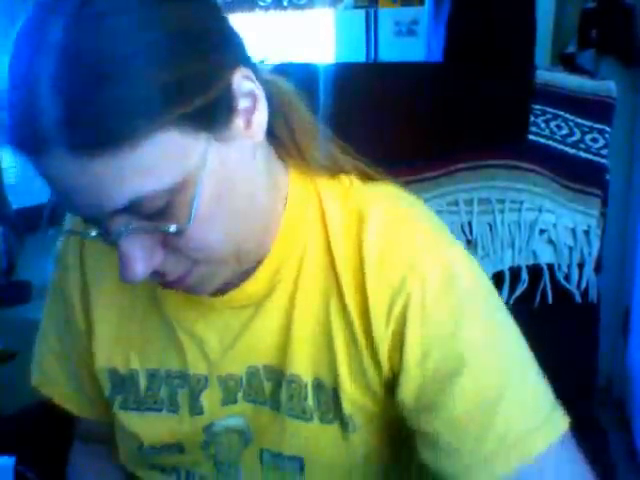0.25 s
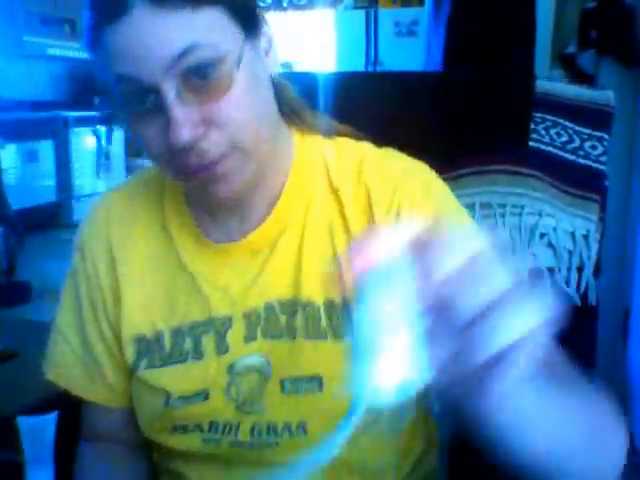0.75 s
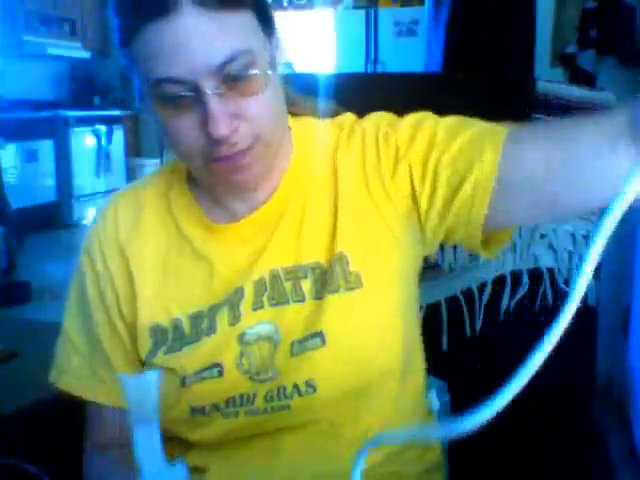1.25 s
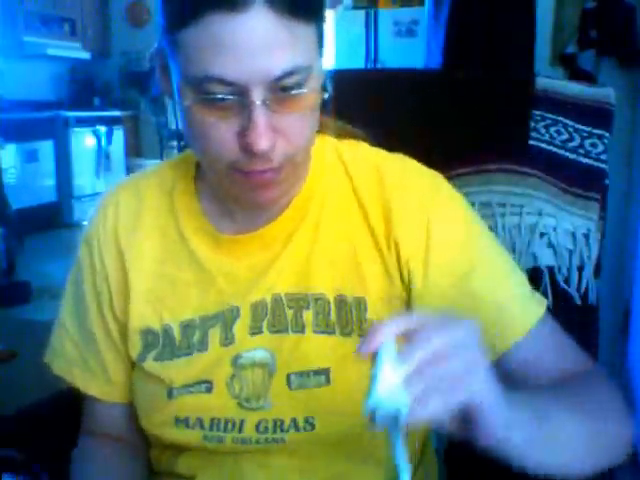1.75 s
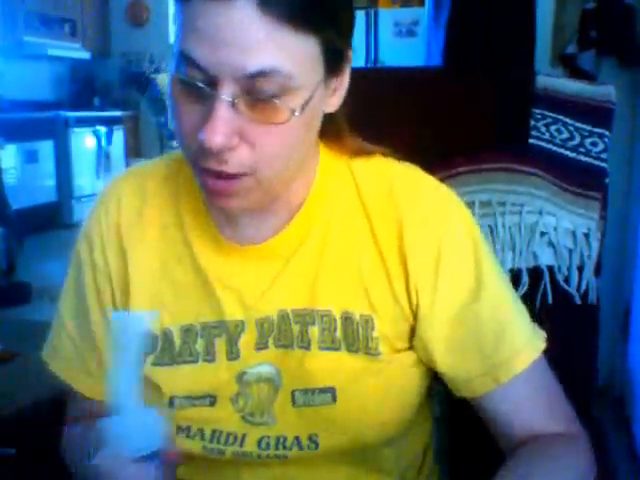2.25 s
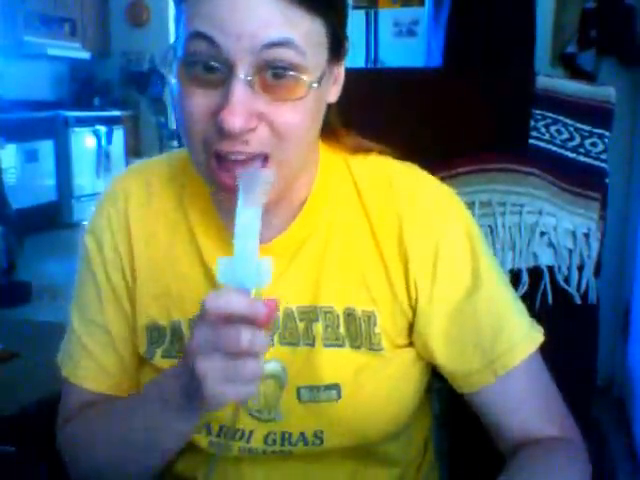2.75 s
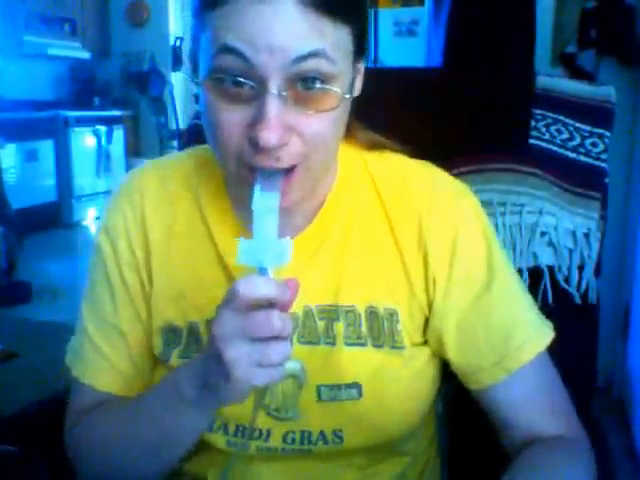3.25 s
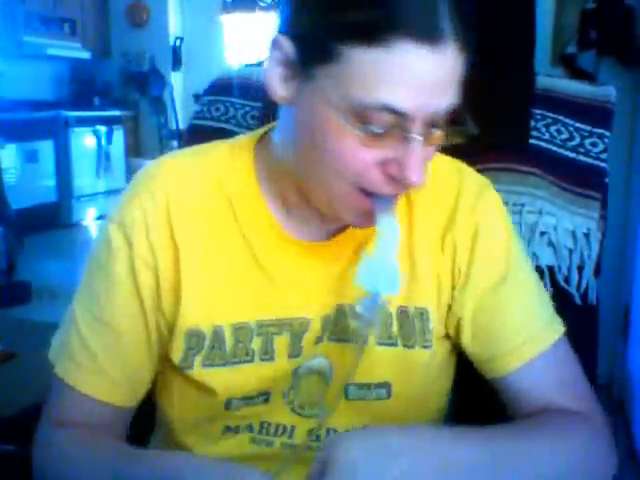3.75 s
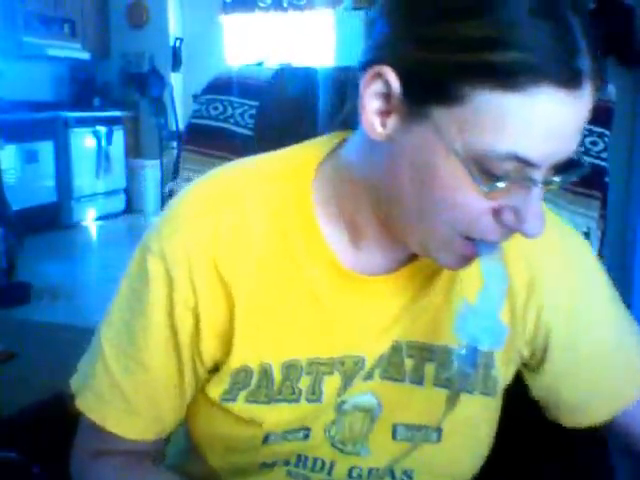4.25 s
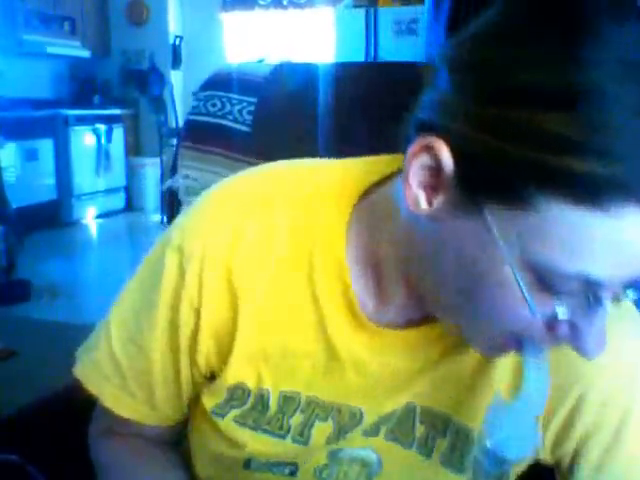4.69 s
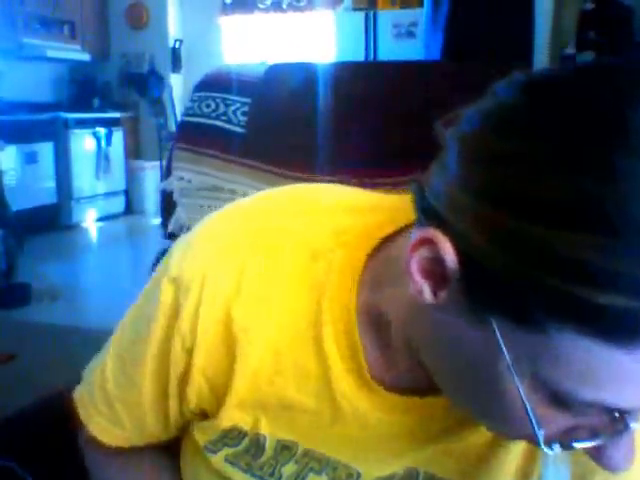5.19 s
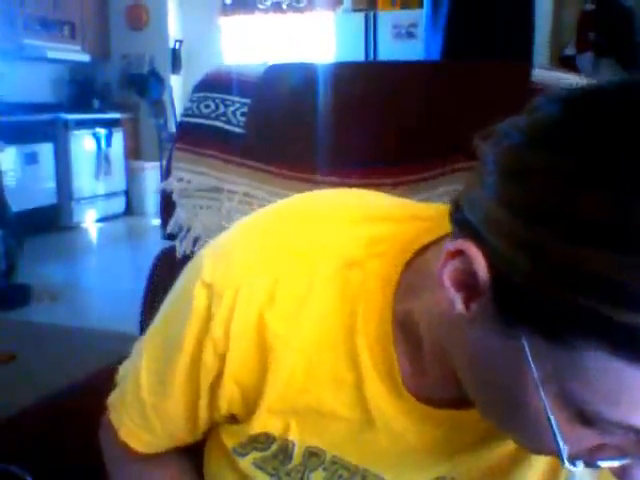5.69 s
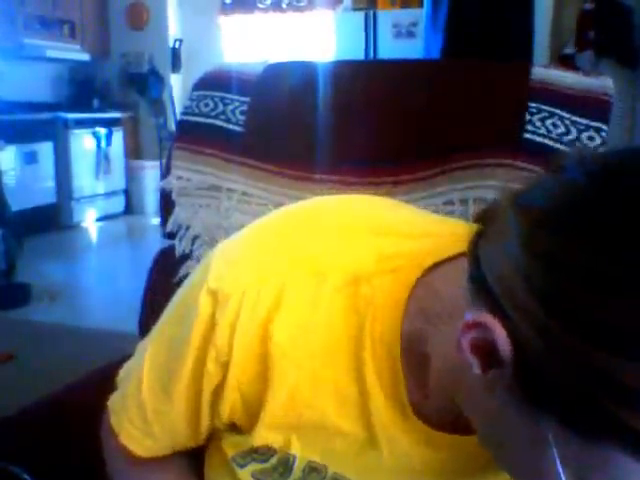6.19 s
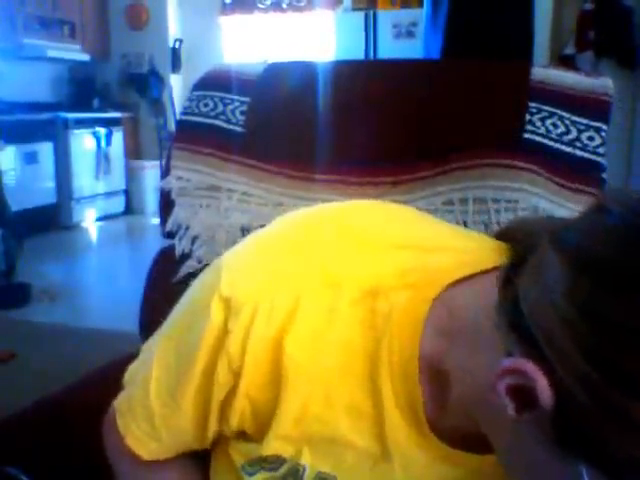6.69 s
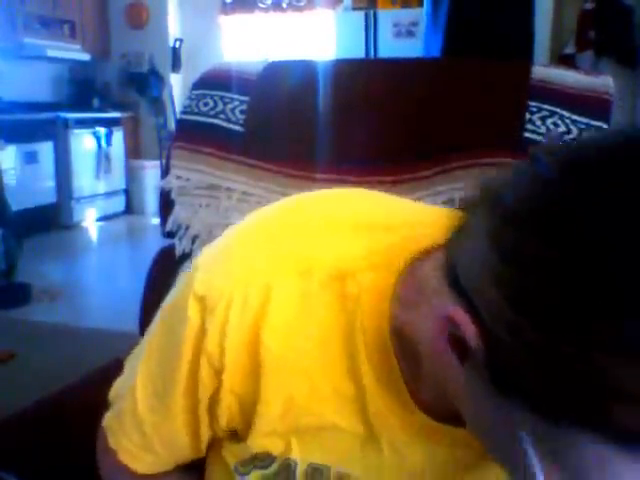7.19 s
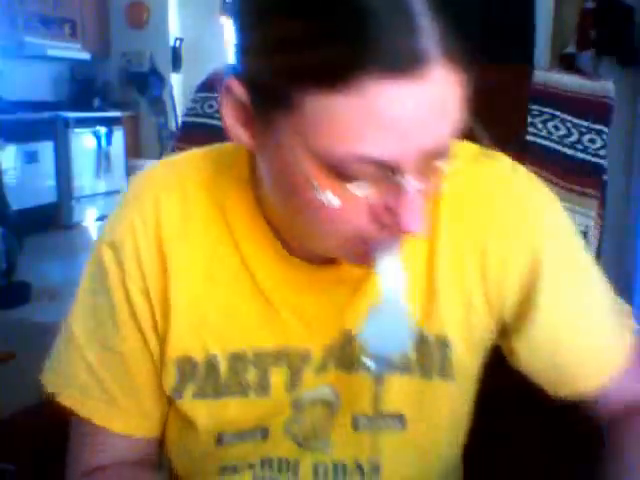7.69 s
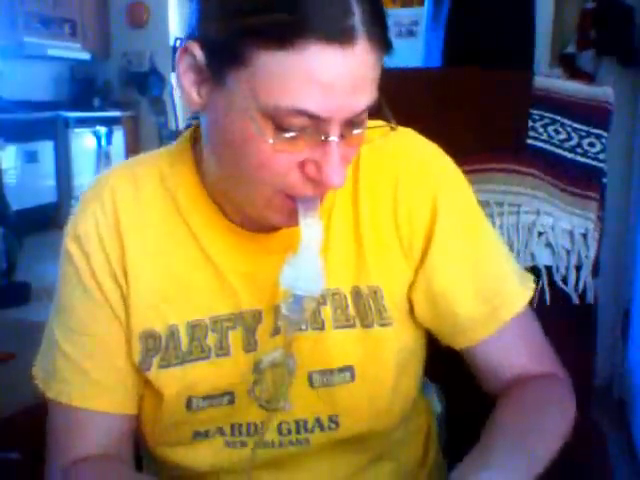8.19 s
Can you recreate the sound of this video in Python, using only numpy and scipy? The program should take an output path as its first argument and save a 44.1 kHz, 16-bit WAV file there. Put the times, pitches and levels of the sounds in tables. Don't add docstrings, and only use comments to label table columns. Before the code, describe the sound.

A steady low fan hum near 90 Hz with soft air noise fills a quiet room, picked up close by a band-limited laptop microphone. At once, 0-0.35 s, hard plastic parts clatter onto a desk, sharp and hollow with short crackling skids. From 0.63 to 1.2 s they are gathered and shaken, a brighter dense rattle that fades into small taps. Light ticks and a brief cable scuff come around 1.4-1.5 s and a tick at 1.8 s. Bright mouthpiece clicks follow at 3.0-3.25 and 3.65 s. Dull plug bumps and low desk thumps fall at 4.8-4.95, 5.3 and 6.0 s, with hardly audible ticks near 6.7 s. From 7.0 to 7.85 s a busier cluster of knocks, scuffs and thumps plays. A small snap at 8.08 s and faint metallic pin clinks until 8.2 s end it, leaving the hum.

```python
import sys
import numpy as np
from scipy import signal
from scipy.fft import rfft, irfft
from scipy.io import wavfile
from scipy.ndimage import uniform_filter1d, minimum_filter1d

SR = 44100
rng = np.random.default_rng(int(sys.argv[2]) if len(sys.argv) > 2 else 0)


def master_out(mix):
    frames = np.transpose(np.atleast_2d(mix))
    ceiling = np.clip(frames, -1, 1)
    pcm = np.round(ceiling * 32767).astype(np.int16)
    wavfile.write(sys.argv[1], SR, pcm)


def magnitude_from_level(level_db):
    exponent = np.asarray(level_db, float) / 20
    return 10 ** exponent


N = 372204

# pitch in Hz, level in dB rms.
FAN_LINES = [(209.9, -71.5), (253.0, -73), (409.1, -91.5), (527.6, -81), (554.5, -84.5), (683.7, -83),
             (899.0, -85), (1023, -81), (1066, -89), (1362, -85), (1405, -88.5), (1534, -88.5), (1701, -90),
             (2385, -99), (2514, -100), (2552, -103.5)]
# frequency in Hz, level in dB per Hz.
AIR_SPECTRUM = [(15, -67.5), (27, -75), (60, -69.5), (100, -70), (150, -78), (300, -81), (500, -84),
                (1000, -92.5), (2100, -99), (4000, -107), (6200, -112), (7400, -122), (9000, -126),
                (12000, -140)]
# start in seconds, strength in dB, softness in dB, # chatter time in
# seconds (the chatter dies by 60 dB in 2.2 times this), ring brought out in Hz.
DROP = [(0.001, -67, 31.5, 0.036, 899.2), (0.052, -58, 5.5, 0.04, 2203), (0.0635, -42.5, 12, 0.05, 902.7),
        (0.0715, -19, 2.5, 0.02, 2290), (0.0828, -30, 17.5, 0.015, 539.6),
        (0.1025, -29.5, 2.5, 0.015, 2317), (0.1255, -39, 4.5, 0.02, 920), (0.157, -53.5, 14, 0.02, 2301),
        (0.1732, -46.5, 3.5, 0.033, 1901), (0.198, -54, 11.5, 0.041, 3400),
        (0.2044, -41, 7.5, 0.023, 896.5), (0.2379, -56.5, 20.5, 0.03, 1600),
        (0.2587, -26.5, 1.5, 0.024, 6280), (0.264, -36.5, 12, 0.03, 2890), (0.2983, -40, 4.5, 0.015, 2260)]
# start in seconds, strength in dB, softness in dB, # chatter time
# in seconds (the chatter dies by 60 dB in 2.2 times this), ring brought out in Hz.
GATHER = [(0.631, -19.5, 3.5, 0.011, 4970), (0.6411, -25, 1.5, 0.017, 2890),
          (0.6505, -18, 2.5, 0.0079, 5680), (0.654, -29.5, 14.5, 0.018, 950), (0.6631, -35, 3, 0.015, 5900),
          (0.6824, -37, 1.5, 0.013, 5910), (0.712, -48, 3, 0.031, 5600), (0.73, -49, 1, 0.0305, 4600),
          (0.7386, -35, 6, 0.03, 4200), (0.7765, -33.5, 2, 0.026, 2720), (0.784, -32.5, 4, 0.033, 4140),
          (0.8006, -32, 2, 0.011, 2270), (0.836, -43, 8, 0.04, 2320), (0.8593, -55, 10.5, 0.02, 3000),
          (0.8809, -20, 2, 0.015, 5100), (0.891, -37, 5.5, 0.02, 900), (0.9028, -30, 5, 0.025, 3200),
          (0.9085, -15.5, 2, 0.016, 5900), (0.9189, -27, 5.5, 0.031, 900), (1.0036, -44, 5, 0.027, 3040),
          (1.017, -55, -1, 0.043, 5900), (1.042, -46.5, 0, 0.048, 4330), (1.0479, -31.5, 1.5, 0.02, 1810),
          (1.1165, -51, 11, 0.028, 1930), (1.1364, -51.5, 17.5, 0.013, 3010),
          (1.1828, -52.5, 18, 0.034, 2320)]
# start in seconds, level in dB, length in seconds.
SKIDS = [
    (.072, -33, 0.066),
    (.135, -45, .09),
    (.26, -42.5, 0.053),
    (.3, -47, 0.06),
    (.632, -31.5, 0.14),
    (.778, -39, 0.079),
    (.882, -30.5, .03),
    (.91, -34.5, 0.14),
    (1.0, -51.5, 0.054),
    (1.042, -40.5, 0.047),
]
# pitch in Hz, width in Hz, level in dB.
PART_MODES = [(500, 120, 12), (925, 25, 3), (1400, 47.4, -5), (1850, 20, -3), (2270, 70, -1), (2885, 38, 3),
              (3578, 260, -0.5), (4621, 140, -1), (5042, 140, -2), (5578, 99, -4.5), (6400, 510, -5),
              (8200, 500, -20)]
# pitch in Hz, width in Hz, level in dB.
DESK_MODES = [(351.3, 40, -5.5), (600, 100, 2.5), (1045.4, 310, -3.5), (1700, 1400, 3.5), (2600, 4000, -11),
              (3607, 900, -4), (5480, 800, -8.5), (6600, 710, -14.5)]
# centre in Hz, width in Hz, share removed.
DESK_DIPS = [(1130, 370, .55), (3800, 410, .6)]
# thud in dB, thud in dB per dB of softness,
# click in dB, click loss in dB per dB of softness.
PART_TOUCH = (-7, 0.9065, 4.5, 3.5)
# start in seconds, peak in dB, pitch in Hz, t60 in seconds.
THUMPS = [(0.071, -8.5, 486, 0.051), (0.066, -21.5, 346.5, 0.14), (0.261, -16.5, 329.9, 0.042),
          (0.635, -27, 350.2, 0.1), (3.436, -28.5, 82, 0.049), (4.797, -19.5, 190.6, 0.051),
          (4.823, -19, 94, 0.033), (4.86, -28.5, 42.4, 0.096), (4.948, -21, 75.3, 0.12),
          (6.017, -24, 69.3, 0.061), (6.031, -21.5, 86.2, 0.047), (7.3, -28, 207.7, 0.055),
          (7.324, -43.5, 82.3, 0.12), (7.4, -20, 82.5, 0.033), (7.603, -19.5, 90.2, 0.06),
          (7.781, -25, 241, 0.029), (7.8, -22.5, 85, 0.09), (7.854, -29, 87.4, 0.058)]
# start in seconds, peak in dB, pitch in Hz, t60 in seconds.
HOLLOW_RINGS = [(0.0635, -12.5, 410, 0.036), (0.127, -23.5, 904, 0.079), (0.24, -52, 1540, 0.042),
                (0.261, -33, 2802, 0.035), (0.912, -20.5, 900, 0.086), (1.409, -51, 1860, 0.0316),
                (1.409, -41, 5840, 0.011), (1.807, -52, 1970, 0.01834), (1.807, -49, 1334, .02),
                (1.807, -49, 4220, 0.02), (3.019, -38, 1416, 0.069), (3.019, -55, 3798, 0.028),
                (3.019, -41, 3050, 0.016), (3.019, -45, 6800, 0.012), (3.125, -51, 1573, 0.036),
                (3.152, -57, 4600, .02), (3.161, -58, 4600, .025), (3.161, -62, 6200, .02),
                (3.258, -58.5, 2240, 0.051), (3.652, -32.5, 1768, .03), (3.652, -51, 4350, 0.025),
                (3.654, -51, 2270, .03), (3.652, -49, 3050, 0.024), (5.302, -64, 472.3, 0.0365),
                (5.301, -49, 1630, 0.026), (5.301, -57, 2790, 0.022), (7.285, -24.5, 500, 0.048),
                (7.401, -58.5, 4074, 0.022), (7.565, -56, 2530, .06), (7.708, -25, 866, 0.027),
                (7.709, -41.5, 2620, 0.0196), (7.709, -55, 5500, 0.0178), (7.724, -44, 907, .05),
                (.205, -26, 600, 0.057), (.298, -41, 2260, 0.02), (.884, -20, 501, .04),
                (1.409, -51.5, 4500, 0.019), (1.409, -50, 7300, .012), (1.41, -39, 520, .05),
                (1.807, -48, 5300, .015), (1.824, -52, 620, .03), (3.019, -47, 2200, .035),
                (3.021, -48, 370, .04), (3.652, -61, 6900, .015), (3.653, -51, 380, .04),
                (4.798, -46, 1499, .04), (4.939, -52, 2500, .025), (4.938, -54, 3400, .02),
                (5.301, -50, 895, .03), (6.021, -44, 1100, .04)]
# start in seconds, peak in dB, pitch in Hz, t60
# in seconds.
PART_RINGS = [(.0725, -14.5, 2290, 0.046), (.0725, -24.5, 2900, 0.036), (.0725, -26, 5494, 0.0129),
              (.103, -22, 2330, 0.032), (.157, -38.5, 2310, 0.064), (.206, -31.5, 930, .05),
              (.259, -24, 6250, 0.0213), (.259, -28, 5470, .02), (.26, -28, 1957, 0.0156),
              (.262, -28, 899, 0.073), (.632, -21.5, 3270, 0.018), (.632, -24, 6520, 0.0149),
              (.643, -24, 2900, 0.0254), (.651, -21.5, 3330, 0.0192), (.684, -33.5, 2312, 0.044),
              (.785, -32, 4170, 0.051), (.792, -38, 2500, .02), (.801, -31.5, 3630, .015),
              (.859, -44.5, 2980, .03), (.882, -19.5, 1527, 0.036), (.882, -25, 2820, 0.026),
              (.882, -27.5, 4350, 0.018), (.903, -31.5, 3281, 0.023), (.91, -20.5, 3131, 0.029),
              (1.006, -57, 7200, .04), (1.016, -52, 5920, .03), (1.049, -24.5, 1620, 0.026),
              (1.049, -23.5, 2960, 0.018), (1.049, -39, 3300, 0.035), (1.049, -21.5, 4260, 0.026),
              (1.049, -34, 6050, 0.03), (1.118, -41, 1930, 0.05), (3.652, -68, 1010, .035),
              (3.652, -50, 1328, .035), (3.652, -56.5, 3380, .035), (4.951, -61, 4000, .03),
              (4.792, -62, 2900, .03), (5.301, -56, 3250, .025), (6.021, -58, 2700, .03),
              (.66, -25, 930, 0.12), (.275, -30, 700, 0.031), (1.486, -58, 2900, .03)]
# start in seconds, main ring in Hz,
# upper ring in Hz, strength in dB, softness in dB.
BUMPS = [(1.362, 467, 1888, -61.5, 4), (4.109, 582, 1500, -65, 12), (4.79, 850, 1592, -42.5, 14),
         (4.842, 1022, 1395, -56, 15), (4.8865, 416, 796, -54.5, 23), (4.896, 1072, 1500, -56, 15),
         (4.937, 1410, 1902, -46.5, 5), (5.3005, 1190, 3290, -47, 5.5), (5.315, 851, 1400, -52.5, 15),
         (5.817, 450, 1335, -61, 16), (6.0195, 1080, 1500, -47, 16.5), (6.031, 510, 300.3, -70.5, 39),
         (7.0105, 745, 1365, -48.5, 10), (7.112, 1200, 707, -58.5, 11), (7.284, 2710, 1210, -40.5, 4.5),
         (7.297, 420, 1700, -49.5, 25.5), (7.359, 1150, 703, -50.5, 10.5), (7.375, 1413, 1990, -61, 6),
         (7.387, 1000, 1850, -53.5, 14), (7.405, 1174, 1900, -57, 11), (7.425, 1500, 897, -58, 12),
         (7.484, 760, 1520, -46.5, 9), (7.558, 2100, 2600, -63, 5), (7.578, 400, 1300, -53.5, 29.5),
         (7.597, 2100, 4720, -54, 6), (7.604, 867.2, 1740, -44, 11), (7.616, 403.3, 882, -60.5, 30.5),
         (7.708, 870, 3450, -54, 5), (7.726, 899, 1280, -55, 19), (7.7786, 383, 1250, -48.5, 22)]
# pitch in Hz, width in Hz, level in dB.
CABLE_MODES = [(263, 84, 9.5), (510, 370, -13.5), (760, 120, -3.5), (1150, 200, -1), (1880, 440, 1.5),
               (2740, 220, -8), (2645.5, 91, -29), (3294, 62, -27), (6000, 400, -53)]
# firmest moment in seconds, level in dB, length in seconds.
SCUFFS = [(1.396, -47, 0.012), (1.42, -50, 0.039), (4.80, -67, 0.089), (4.897, -59, 0.05),
          (5.314, -52, 0.035), (7.295, -46, 0.034), (7.378, -60, 0.044), (7.39, -56.5, 0.12),
          (7.41, -69, 0.059), (7.56, -62, 0.047), (7.605, -52.5, 0.087)]
# start in seconds, main ring in Hz, upper ring in Hz,
# strength in dB, softness in dB.
SNAPS = [(1.4079, 1880, 2900, -44.5, 8), (1.4845, 2290, 3050, -52, -16), (1.806, 1914, 6120, -49.5, 6.5),
         (3.0185, 1442, 3860, -47, 7.5), (3.125, 1580, 3800, -75, 17), (3.151, 2220, 4600, -64.5, -6),
         (3.03, 1406, 3530, -67, 17), (3.16, 2193, 4600, -66, -3), (3.2535, 2260.0, 6000, -66.5, -3.5),
         (3.6515, 1780, 3300, -47, 6), (3.799, 1907, 3200, -74, 10), (6.685, 1866, 4030, -68, 5),
         (6.7394, 2360, 3990, -73, 6), (8.0825, 2552, 1580, -54, -1), (8.085, 4070, 1980, -74, -9)]
# pitch in Hz, width in Hz, level in dB.
MOUTHPIECE_MODES = [(486, 87, 7.5), (930, 1800, 0.5), (1300, 1470, 6.5), (1745, 140, 10.5), (2210, 82, 10),
                    (2900, 14, 6), (3290, 45, -7.5), (4600, 240, -12), (4760, 150, -19), (6650, 200, -44.5),
                    (7200, 59, -25)]
# start in seconds, peak in dB.
PIN_TOUCHES = [
    (6.972, -78),
    (8.125, -79.5),
    (8.16, -70),
    (8.176, -67),
    (8.189, -75),
]
# pitch in Hz, level in dB, t60 in seconds.
PIN_MODES = [(2260, -8, 0.036), (2290, -2.5, 0.08), (3120, -8, 0.11), (3580, -7.5, 0.079),
             (5100, -26, 0.055), (6780, -14.5, 0.033)]
# frequency in Hz, t60 in seconds.
ROOM_T60 = [(250, 0.58), (1000, 0.33), (3000, 0.06), (8000, 0.05)]


def rms_one(x):
    return x / np.sqrt(np.mean(x ** 2) + 1e-20)


def at_hz(points, hz):
    table_hz, values = np.array(points).T
    return np.interp(np.log(hz), np.log(table_hz), values)


def drift(rate):
    r = np.exp(-80 * np.pi * rate / SR)
    slow = signal.lfilter([1], [1, -2 * r, r * r], rng.standard_normal(N // 40 + 2002))[2000:]
    return np.interp(np.arange(N) / 40, np.arange(len(slow)), rms_one(slow))


def low_pass(x, order, hz):
    return signal.sosfilt(signal.butter(order, hz, fs=SR, output="sos"), x)


def band_pass(x, low_hz, high_hz):
    return signal.sosfilt(signal.butter(2, [low_hz, high_hz], "band", fs=SR, output="sos"), x)


def resonate(x, hz, width):
    r = np.exp(-np.pi * width / SR)
    poles = [1, -2 * r * np.cos(2 * np.pi * hz / SR), r * r]
    return signal.lfilter([(1 - r * r) / 2, 0, (r * r - 1) / 2], poles, x)


def add(out, s, sound):
    at = round(s * SR)
    out[at:at + len(sound)] += sound[:N - at]


def touch_levels(db, soft_db, law):
    thud_db, thud_gain, click_db, click_loss = law
    return db + thud_db + thud_gain * soft_db, db, db + click_db - click_loss * soft_db


def first_blow_db(soft_db, hard_db):
    return hard_db - 0.95 * soft_db


def knock(modes, edges_hz, levels_db, t60, spread_db, blow_db):
    t = np.arange(3000) / SR
    lumps = magnitude_from_level(3 * rng.standard_normal(len(t) // 20)).repeat(20)
    grit = rng.standard_normal(len(t)) * lumps * np.minimum(t / 0.00082, 1)
    grit[[20, 43, 44, 71]] += magnitude_from_level(blow_db) / 2 * np.array([.4, 1, 1, -.7])
    luck = spread_db * rng.standard_normal(len(modes))
    body = 0
    for k, (hz, width, db) in enumerate(sorted(modes)):
        decay_db = -60 * t / np.clip(t60, .004, .15) * (hz / 1500) ** 0.22
        body = body + (-1) ** k * magnitude_from_level(db + luck[k]) * resonate(grit * magnitude_from_level(decay_db) + 1e-18, hz, width)
    out = 0
    for low, high, db in zip(edges_hz, edges_hz[1:], levels_db):
        part = band_pass(body, low, high)
        part = magnitude_from_level(db) * part / np.sqrt(np.sum(part ** 2) / (SR / 100))
        out = part - out
    return out


def rubbing(level, modes, per_s, size_db, cut_hz, full_db):
    sizes = magnitude_from_level(size_db * np.minimum(rng.exponential(1, N), 4)) * rng.choice([-1, 1], N)
    clicks = rng.random(N) < per_s * magnitude_from_level(5 * drift(40)) / SR
    grit = sizes * clicks + 1e-18
    rings = [(-1) ** k * magnitude_from_level(db) * resonate(grit, hz, width) for k, (hz, width, db) in enumerate(modes)]
    body = rms_one(sum(rings))
    dull = low_pass(body, 3, cut_hz)
    brightness = np.minimum(level / magnitude_from_level(full_db), 1) ** 1.3
    return level * (dull + brightness * (body - dull))


def fan():
    t = np.arange(N) / SR
    hum = magnitude_from_level(-50 + drift(5.9) / 2) * np.sin(2 * np.pi * 90.15 * t + 0.12 * drift(0.99))
    lines = 0
    for hz, db in FAN_LINES + [(117.02, -77)]:
        lines = lines + magnitude_from_level(db + 1.5 * drift(5)) * np.sin(2 * np.pi * hz * t + 2.5 * drift(3))
    whine = magnitude_from_level(-105) * np.sin(2 * np.pi * 8000 * t)
    hz = np.maximum(np.fft.rfftfreq(N, 1 / SR), 1)
    air = rms_one(irfft(rfft(rng.standard_normal(N)) * magnitude_from_level(at_hz(AIR_SPECTRUM, hz)), N))
    breeze = magnitude_from_level(drift(3) / 2)
    return np.sqrt(2) * (hum + lines + whine) + magnitude_from_level(-60) * breeze * air


def skidding(rows):
    fade_db_per_s, stop_db = 89, 12.5
    t, level = np.arange(N // 4) / SR, np.zeros(N // 4)
    for s, db, length in rows:
        since = np.maximum(t - s, 0)
        fade_db = fade_db_per_s * since + stop_db * (since / length) ** 6
        level = np.maximum(level, (t > s) * magnitude_from_level(db - np.minimum(fade_db, 200)))
    return np.pad(uniform_filter1d(level, size=200), (0, N - N // 4))


def clatter():
    out = np.zeros(N)
    modes = sorted([(hz, 2.0 * width + 40, db) for hz, width, db in PART_MODES] + DESK_MODES)
    for s, db, soft_db, t60, ring_hz in DROP + GATHER:
        ring = (ring_hz, 0.042 * ring_hz + 50, 10)
        levels_db = touch_levels(db, soft_db, PART_TOUCH)
        sound = knock(modes + [ring], (300, 1200, 3600, 9600), levels_db, 2.2 * t60,
                      spread_db=4.5, blow_db=first_blow_db(soft_db, 20.5))
        add(out, s, magnitude_from_level(-6.5) * sound)
    slide = rubbing(skidding(SKIDS), modes, per_s=3000.0, size_db=4.0, cut_hz=3900, full_db=-45.5)
    out = out + magnitude_from_level(-8.0) * slide
    return out - sum(share * resonate(out, hz, width) for hz, width, share in DESK_DIPS)


def thumps(rows, rise_s):
    out, t = np.zeros(N), np.arange(8000) / SR
    for s, db, hz, t60 in rows:
        swing = (1 - np.exp(-t / rise_s)) * np.sin(2 * np.pi * hz * t)
        add(out, s, magnitude_from_level(db - 8.0 - 60 * t / max(t60, .01)) * swing)
    return out


def ticks(rows, modes, edges_hz, law, t60, cut_loss):
    out, broad = np.zeros(N), [(hz, 2.77 * width, db) for hz, width, db in modes]
    for s, *rings_hz, db, soft_db in rows:
        rings = [(hz, 0.074 * hz + 40, 12) for hz in rings_hz]
        sound = knock(broad + rings, edges_hz, touch_levels(db, soft_db, law), t60,
                      spread_db=2, blow_db=first_blow_db(max(soft_db, 0), 22))
        cut_hz = np.clip(7700 * magnitude_from_level(-cut_loss * soft_db), 1500, 9000)
        add(out, s, magnitude_from_level(-5) * low_pass(sound, 4, cut_hz))
    return out


def bumps():
    return ticks(BUMPS, CABLE_MODES, (220, 600, 1550, 4500), law=(-15, 0.8592, 3, 2.85), t60=0.047, cut_loss=0.79)


def cracks(rows):
    out, t = np.zeros(N), np.arange(1500) / SR
    for s, *rings_hz, db, soft_db in rows:
        grit = band_pass(rng.standard_normal(len(t)) * magnitude_from_level(-60 * t / 0.03), 5200, 6900)
        add(out, s, magnitude_from_level(db - 11 - 1.3 * soft_db) * grit)
    return out


def strokes(rows):
    rise, edge_db = 0.48, 23
    t, level = np.arange(N) / SR, 0
    for s, db, length in rows:
        away = np.maximum((s - t) / rise, (t - s) / (1 - rise)) / length
        level = level + (away < 1) * magnitude_from_level(db - edge_db * np.minimum(away, 1))
    return level


def scuffs():
    modes = [(hz, 5.0 * width, 0.6 * db) for hz, width, db in CABLE_MODES]
    rustle = rubbing(strokes(SCUFFS), modes, per_s=3000, size_db=2.5, cut_hz=2200, full_db=-40)
    return low_pass(rustle, 3, 2800)


def snaps():
    return ticks(SNAPS, MOUTHPIECE_MODES, (300, 1200, 3400, 7300), law=(-19, 1.76, -16, 0.1), t60=0.0323, cut_loss=0)


def clink():
    touches = np.zeros(N) + 1e-18
    touches[[round(s * SR) for s, db in PIN_TOUCHES]] = magnitude_from_level(np.array(PIN_TOUCHES)[:, 1])
    return sum(magnitude_from_level(db) * resonate(touches, hz, 2.84 / t60) * t60 * SR / 7 for hz, db, t60 in PIN_MODES)


def room(x):
    t, tail = np.arange(20000) / SR, 0
    for hz in 250 * 2 ** np.arange(6):
        band = band_pass(rng.standard_normal(len(t)), hz / np.sqrt(2), hz * np.sqrt(2))
        tail = tail + band * magnitude_from_level(-60 * t / at_hz(ROOM_T60, hz))
    tail = tail * np.minimum(t / 0.028, 1)
    return signal.oaconvolve(x, tail / np.sqrt(np.sum(tail ** 2)))[:N]


def scene():
    near = clatter()
    small = snaps() + bumps()
    echo = room(magnitude_from_level(-23.0) * near + magnitude_from_level(-26.5) * small)
    nudges = thumps(THUMPS, rise_s=0.0032)
    rings = thumps(HOLLOW_RINGS, rise_s=0.00077) + thumps(PART_RINGS, rise_s=0.0006)
    mix = near + small + echo + scuffs() + clink() + nudges + rings + fan() + cracks(BUMPS)
    return mix[None]


def gate(dry):
    opens_db, knee_db, listens_s, memory_s = -66, 6, 0.012, 0.93
    most_db, full_at_db, lift_slope = 6.5, -21, 0.083
    heard = band_pass(dry, 1200, 6000)
    heard_db = 10 * np.log10(uniform_filter1d(heard ** 2, int(listens_s * SR)) + 1e-12)
    span = int(memory_s * SR) | 1
    loudest_db = -minimum_filter1d(-heard_db, span, origin=span // 2)
    full_db = np.clip(most_db + lift_slope * (loudest_db - full_at_db), 0, most_db)
    lift_db = full_db * np.clip((heard_db - opens_db) / knee_db, 0, 1)
    return dry * magnitude_from_level(uniform_filter1d(lift_db, size=400))


def band_limit(x):
    return signal.sosfilt(signal.butter(12, 8890, fs=SR, output="sos"), x)


def record(dry):
    overload = .8
    rounded = overload * np.tanh(gate(dry) / overload)
    cut = signal.sosfilt(signal.cheby2(10, 60, 9400, fs=SR, output="sos"), rounded)
    mix = low_pass(cut, 3, 8600)
    return band_limit(mix)


dry = scene()
out = record(dry)
master_out(out)
```